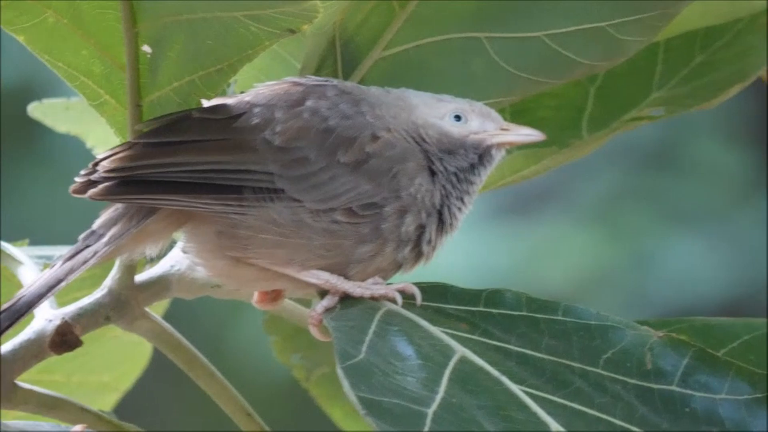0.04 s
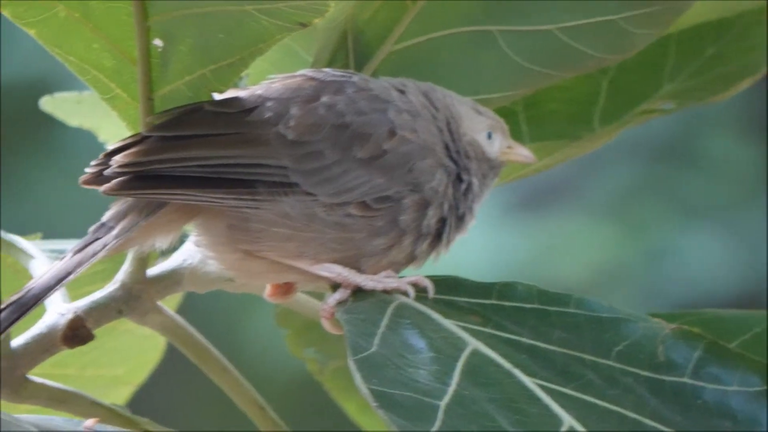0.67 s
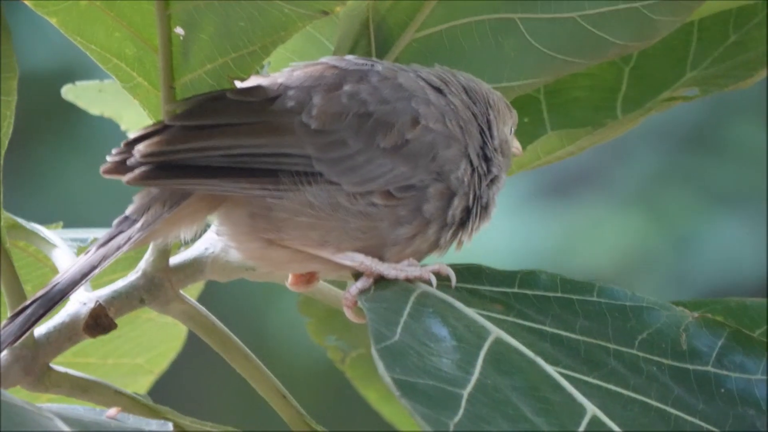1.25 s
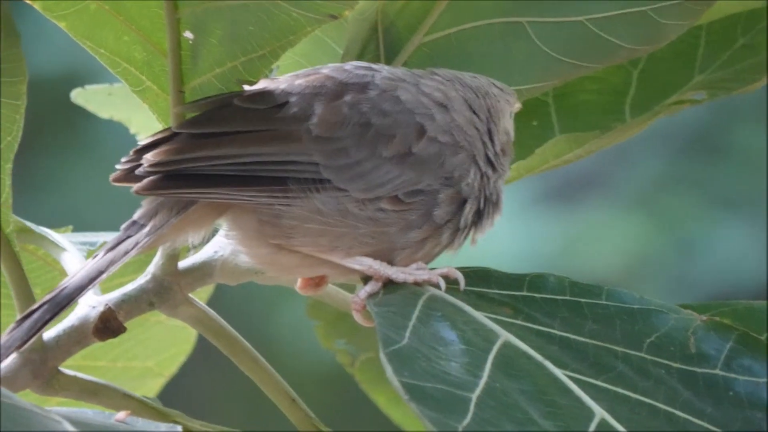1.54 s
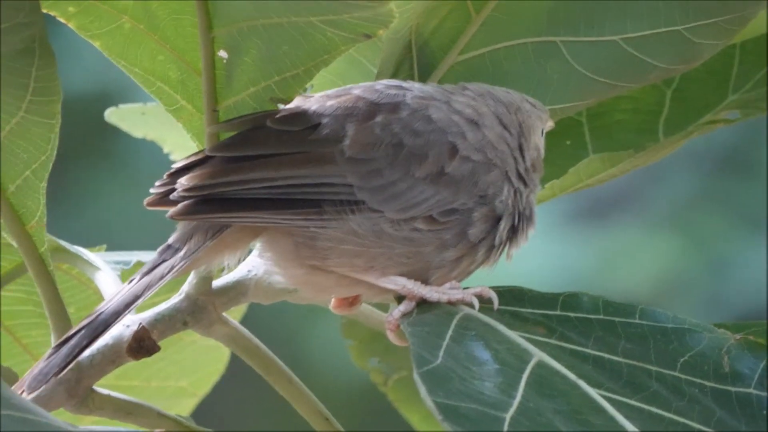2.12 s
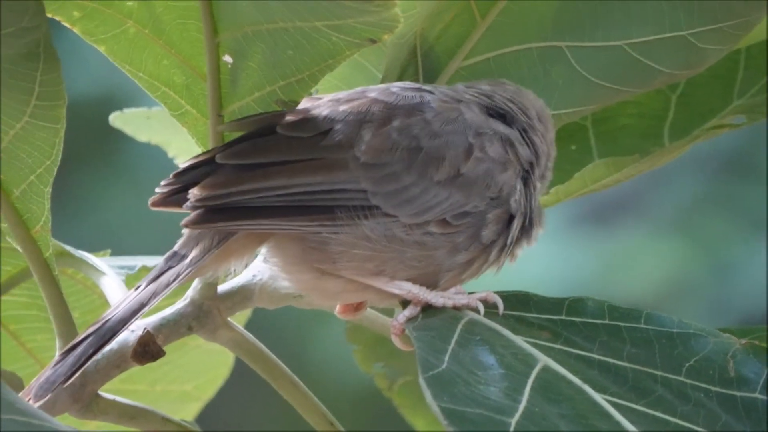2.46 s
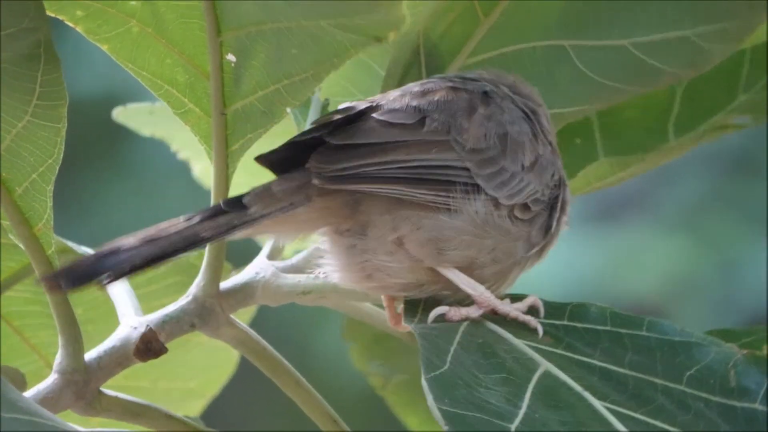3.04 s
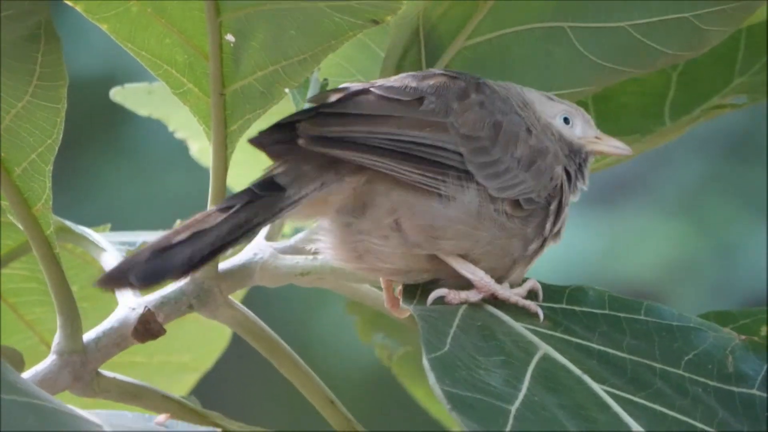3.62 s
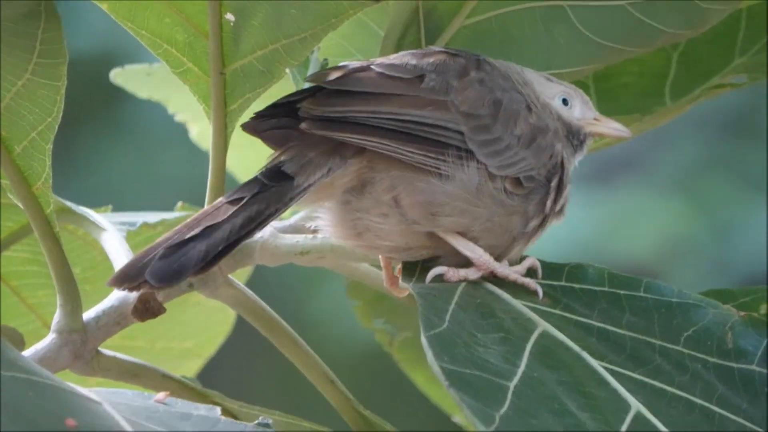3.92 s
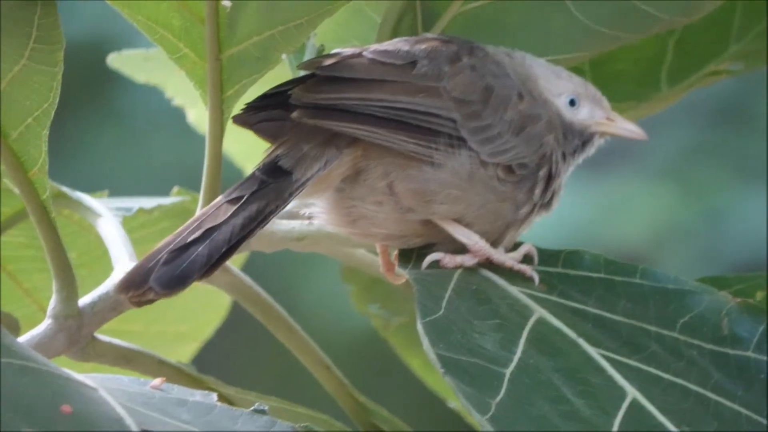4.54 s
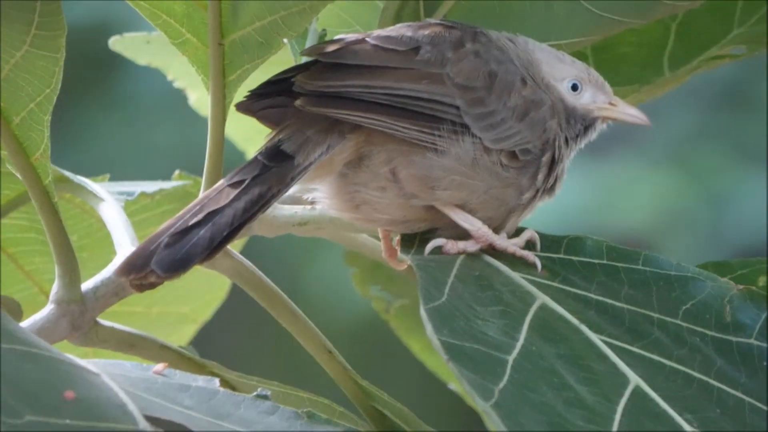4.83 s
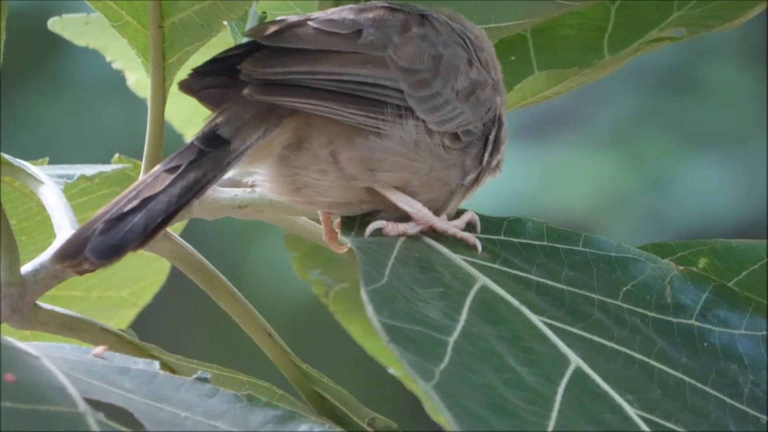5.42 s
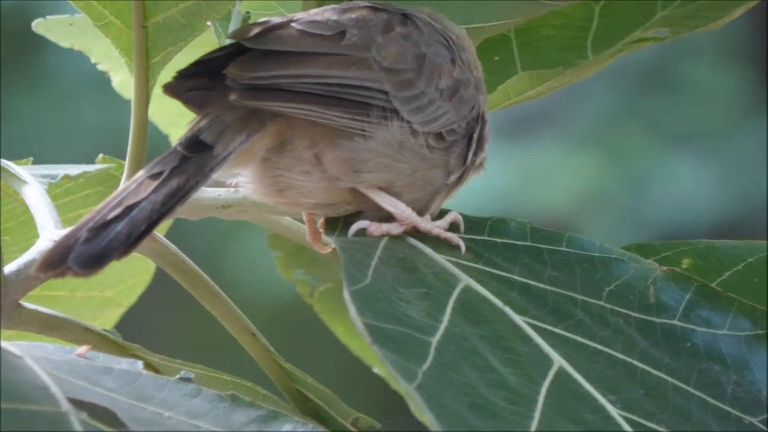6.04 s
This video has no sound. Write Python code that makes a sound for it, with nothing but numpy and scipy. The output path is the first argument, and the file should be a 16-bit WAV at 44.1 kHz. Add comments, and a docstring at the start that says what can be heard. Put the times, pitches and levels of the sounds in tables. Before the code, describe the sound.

Outdoors among trees, a bird on the left gives a loud, echoing two-note whistle four times. A second bird pipes quick, lower notes through the first two thirds, while a distant engine thuds and gradually fades. Faint insects buzz in phrases and small birds chirp over soft air. Midway, feathers ruffle softly close to the microphone, then a crow caws several times.

```python
"""Koel among trees

A koel repeats its loud two-note whistle; trunks and foliage throw it back with a long tail.
Insects stridulate in phrases over a wash of air, a second bird pipes low notes, small birds chirp.
A one-cylinder engine thuds in the distance and fades. Later a babbler ruffles its feathers
close by, a crow caws and a faint drone rises."""
import sys
import numpy as np
from scipy import signal
from scipy.fft import rfft, irfft
from scipy.io import wavfile
from scipy.ndimage import uniform_filter1d

SR = 44100
rng = np.random.default_rng(int(sys.argv[2]) if len(sys.argv) > 2 else 0)


def wrap_up_sound(samples):
    """Save the sound to the file named by the first command line argument, as 16-bit audio."""
    columns = np.atleast_2d(samples).T
    # keep every value between -1 and 1, then stretch to whole-number steps
    tamed = np.clip(columns, -1, 1)
    steps = np.round(tamed * 32767).astype(np.int16)
    wavfile.write(sys.argv[1], SR, steps)


N = 276507
TIME = np.arange(N) / SR

# left-right likeness of noise (frequency [Hz], correlation [0-1])
COHERENCE = [(30, .5), (70, 1), (290, 0.96), (640, 0.81), (1400, 0.6), (7000, 0.67), (15000, 0.38)]
# foliage decay (frequency [Hz], T60 [s])
FOLIAGE_T60 = [(150, 0.15), (900, 0.98), (1300, .8), (2000, 0.9), (4000, 1.0), (7000, 0.8)]
# trunk and wall reflections (delay [s], gain [dB])
ECHOES = [(.009, -6), (.019, -6), (.026, -12.5), (.033, -6.5), (.043, -15.5), (.052, -17), (.066, -22),
          (.078, -7), (.095, -18), (.112, -18.5), (.17, -18), (.25, -21)]

# koel, first notes (time [s], top pitch [Hz], level [dB])
OPENING_NOTES = [(-.155, 2064, -32.5), (1.508, 2102, -32.5), (3.216, 2164, -32), (4.843, 2289, -29.5)]
# koel, second notes (time [s], top pitch [Hz], level [dB], dive depth [ratio])
CLOSING_NOTES = [(.214, 2265, -33, 1.0), (1.864, 2300, -33, 1.0), (3.579, 2391, -30.5, .98),
                 (5.212, 2459, -29.5, 0.87)]
# leap, sag, hold, fall (time in note [s], pitch / top [ratio], gain [dB])
OPENING_CONTOUR = [(0, .7, -16), (.018, .9, -11), (.035, .98, -6.5), (.053, .998, -4), (.085, .96, -3),
                   (.13, .98, -4), (.168, .965, -1), (.207, .89, -4), (.25, .77, -11)]
# arch, dive, flick, sink (time in note [s], pitch / top at full depth [ratio], gain [dB])
CLOSING_CONTOUR = [(0, .73, -14), (.02, .88, -7.5), (.04, .955, -5), (.068, 1, -2.8), (.12, .988, -1.3),
                   (.15, .95, -2), (.178, .8, -6), (.2, .69, -5), (.214, .71, -6.5), (.229, .885, -5.5),
                   (.255, .838, -3.5), (.29, .79, -6), (.32, .72, -14)]
# koel harmonics 2, 3, 4 at FULL_EFFORT_DB and CREST_HZ (gain [dB])
OVERTONES_DB = [-48, -13, -62]
FULL_EFFORT_DB, CREST_HZ = -13.5, 2270

# insect bands (frequency [Hz], relative density [dB])
UPPER_INSECT_SPECTRUM = [(4300, -44), (4700, -8.5), (4950, -1.5), (5150, 1), (5400, -10), (5900, -41)]
LOWER_INSECT_SPECTRUM = [(3600, -44), (4200, -15), (4500, -0.5), (4720, 1), (4950, -3), (5400, -40)]
# insect phrases (time [s], length [s], level [dB])
UPPER_PHRASES = [(-.37, 0.48, -49.5), (.655, 0.4, -50.5), (1.475, 0.6, -51.5), (2.485, 0.52, -50),
                 (3.445, 0.56, -50), (4.42, 0.34, -49), (5.44, 0.48, -50), (6.2, .45, -56)]
LOWER_PHRASES = [(-.4, 0.43, -46), (.26, 0.52, -47), (.94, 0.27, -52), (1.69, 0.72, -51.5),
                 (2.28, 0.51, -47), (2.88, 1.0, -50.5), (4.18, 0.786, -49.5), (5.5, 0.82, -52.5)]

# open air and broad hiss (frequency [Hz], relative density [dB])
AIR_SPECTRUM = [(20, -25), (50, -19), (90, 1.5), (140, 8.5), (250, 1), (480, -6), (850, -5.5), (1500, -4),
                (2600, -6.5), (4000, -5.5), (6000, -11), (7500, -20), (9300, -17.5), (15000, -34)]
HISS_SPECTRUM = [(50, -23), (200, 21.5), (450, 3), (1000, 4.5), (2500, -6.5), (5000, -5), (7500, -7.5),
                 (9300, -5), (12000, -15.5), (15000, -21)]
# hiss fade (time [s], level [dB])
HISS_LEVEL = [(0, -44), (.5, -48), (1.5, -50.5), (2.7, -53), (4, -57.5), (6.27, -77)]

# piping notes, about four a second (time [s], level [dB])
PIPING_NOTES = [(0.012, -36.5), (0.268, -35.5), (0.513, -36.5), (0.754, -35.5), (1.017, -35), (1.257, -35),
                (1.513, -35), (1.767, -37), (2.049, -36.5), (2.393, -36), (2.717, -36), (3.013, -37.5),
                (3.281, -39.5), (3.548, -37.5), (3.787, -36)]
# firm pip, softer arch (time in note [s], pitch [Hz], gain [dB])
PIPING_CONTOUR = [(0, 1250, -6), (.016, 1305, 4), (.028, 1370, -1), (.04, 1480, -6), (.062, 1680, -8),
                  (.09, 1470, -6), (.112, 1140, -8), (0.126, 1020, -13)]
# rms pitch roughness (pip [ratio], arch [ratio])
PIPING_JITTER = (.08, .17)

# engine speed (time [s], firing rate [Hz])
FIRING_RATE = [(0, 14.684), (.5, 14.836), (1.2, 15.133), (1.7, 15.53), (2.5, 15.696), (4.2, 15.865),
               (5.2, 15.518), (5.7, 15.077), (6.27, 14.482)]
# exhaust thud (frequency [Hz], relative density [dB])
EXHAUST_SPECTRUM = [(20, -58), (50, -26.5), (68, -39), (95, -9.5), (120, -4), (142, 4.5), (165, 1),
                    (190, -11), (220, -4.5), (300, -11), (365, -12.5), (420, -29), (700, -54),
                    (2000, -58.5)]
# engine loudness (time [s], level [dB])
ENGINE_LEVEL = [(0, -39.3), (.55, -41.5), (1, -38.6), (1.65, -37.5), (2, -41.2), (2.8, -41.5), (3.7, -43.7),
                (4.2, -48), (4.55, -48), (4.72, -45.3), (5.25, -45.8), (5.5, -50), (5.65, -47.5),
                (5.85, -48.5), (6.27, -48.5)]
# knock on either side of the exhaust pipe's hum (time [s], gain [dB])
KNOCK_GAIN = [(0, .7), (1.6, .3), (2, -1), (3.7, -2.5), (4.3, -2), (5.2, -4.5), (5.8, -7), (6.27, -3)]

# small birds' slurs (time [s], length [s], start pitch [Hz], fall [ratio], level [dB])
SLURS = [(0.216, 0.0476, 3570, 0.074, -46.5), (0.313, 0.042, 4400, 0.22, -45.5),
         (0.924, .04, 3480, 0.074, -49.5), (1.014, 0.028, 4200, 0.25, -52), (1.705, 0.046, 4400, 0.14, -49),
         (2.26, 0.09, 10200, .03, -64), (2.33, 0.1, 3520, 0.14, -51), (2.609, 0.053, 3350, .11, -50),
         (2.828, 0.077, 3670, 0.055, -55), (3.664, 0.14, 3900, 0.13, -48), (4.38, .09, 4150, .04, -54),
         (5.23, .14, 3450, .12, -57)]
# held whistles (time [s], length [s], pitch [Hz], level [dB])
WHISTLES = [(0.873, 0.2, 2985, -57), (1.2, .22, 2985, -59), (2.653, 0.07, 2975, -48.5),
            (4.944, 0.26, 2973, -56), (5.28, .3, 2960, -60), (5.786, 0.26, 1423, -56),
            (5.852, 0.18, 8600, -66), (5.91, 0.2, 2940, -53)]

# feather strokes (time [s], length [s], level [dB])
RUFFLES = [(2.859, 0.12, -55), (2.986, 0.089, -48.5), (3.04, 0.21, -56), (3.096, 0.027, -58),
           (3.196, 0.095, -57.5), (4.666, 0.037, -57), (5.42, 0.28, -57.5)]
# feather friction (frequency [Hz], relative density [dB])
FEATHER_SPECTRUM = [(1500, 4), (4000, 5.5), (7000, 5), (11000, 2), (15000, -2)]

# caws (time [s], length [s], nominal pitch [Hz], formant scale [ratio], roughness [0-1], level [dB])
CAWS = [(3.82, 0.12, 439, 1.084, 0.84, -39), (4.172, 0.12, 438.1, 1.037, 0.97, -38),
        (5.37, 0.065, 420, 1.06, 0.24, -55.5), (5.749, .06, 382.4, 1.03, 0.36, -47.5),
        (6.102, 0.092, 385, 1.004, 0.78, -43.5)]
# throat resonances (unscaled centre [Hz], width [Hz], gain [dB])
CROW_FORMANTS = [(837, 330, 2.5), (1644, 310, 2), (2680, 990, -4.5), (3250, 220, -9.5)]

# far drone (time [s], pitch [Hz], level [dB])
DRONE = [(4.3, 260, -90), (4.55, 268, -56), (4.9, 270, -59), (5.17, 275, -52), (5.4, 300, -61),
         (5.65, 300, -90)]


def amp(db):
    """Decibels to gain."""
    return 10 ** (np.asarray(db) / 20)


def unit(x):
    """Scale to rms 1."""
    return x / np.sqrt(np.mean(x ** 2) + 1e-20)


def curve(rows):
    """Rows (time, value), interpolated per sample."""
    return np.interp(TIME, *np.transpose(rows))


def spectrum(rows, hz):
    """Rows (frequency, value), interpolated on a log axis."""
    row_hz, value = np.transpose(rows)
    return np.interp(np.log(hz + 1), np.log(row_hz + 1), value)


def add(mix, start_s, sound):
    """Mix a sound in, cropped to fit."""
    start = round(start_s * SR)
    sound = sound[max(-start, 0):]
    part = mix[max(start, 0):][:len(sound)]
    part += sound[:len(part)]


def pan(left_db):
    """Channel gains for a left-minus-right level."""
    return amp([[left_db / 2], [-left_db / 2]])


def pair(a, b, coherence):
    """Correlated stereo from two independent signals."""
    coherence = np.clip(coherence, 0, 1)
    return np.array([a, coherence * a + np.sqrt(1 - coherence ** 2) * b])


def noise(colour):
    """Diffuse coloured stereo noise, rms 1."""
    hz = np.fft.rfftfreq(N, 1 / SR)
    a, b = rfft(rng.standard_normal((2, N)))
    return unit(irfft(pair(a, b, spectrum(COHERENCE, hz)) * amp(spectrum(colour, hz)), N))


def wander(size, rate_hz):
    """Smooth random drift, rms about 1."""
    hz = np.fft.rfftfreq(size + SR, 1 / SR)
    return unit(irfft(rfft(rng.standard_normal(size + SR)) * np.exp(-(hz / rate_hz) ** 2)))[:size]


def echoes(x):
    """Single reflections, slightly offset between channels."""
    out = np.zeros((2, N))
    for delay_s, db in ECHOES:
        for channel in out:
            add(channel, delay_s + rng.uniform(0, 93e-6), amp(db) * x)
    return out


def foliage(x, build_s, coherence):
    """Leaf scatter: a dense tail that builds, then decays by band."""
    size = 2 * SR
    taps = rng.standard_normal((2, size)) * (rng.random((2, size)) < .1)
    hz, t, bands = signal.stft(pair(*taps, coherence), SR, nperseg=256)
    bands = bands * amp(-60 * t / spectrum(FOLIAGE_T60, hz)[:, None]) * (1 - np.exp(-t / build_s))
    tail = signal.istft(bands, SR, nperseg=256)[1]
    midband = abs(np.fft.rfftfreq(tail.shape[1], 1 / SR) - 2000) < 500
    tail /= np.sqrt(np.mean(abs(rfft(tail)[:, midband]) ** 2))
    return signal.fftconvolve(x[None], tail, axes=1)[:, :N]


def koel_note(contour, top_hz, depth, db):
    """Gliding near-sine; unsteady overtones emerge when loud and high."""
    knots_s, ratio, shape_db = np.transpose(contour)
    t = np.arange(0, knots_s[-1], 1 / SR)
    dip = uniform_filter1d(1 - np.interp(t, knots_s, ratio), size=450)  # the voice rounds each turn
    hz = top_hz * (1 - depth * dip)
    phase = 2 * np.pi * np.cumsum(hz * (1 + .006 * wander(len(t), 72))) / SR
    level = amp(db + np.interp(t, knots_s, shape_db) + 2.4 * wander(len(t), 57))
    effort = level / amp(FULL_EFFORT_DB) * (hz / CREST_HZ) ** 4
    rough_phase = phase + .22 * wander(len(t), 400)
    overtones = sum(amp(gain_db) * np.sin(k * rough_phase) for k, gain_db in enumerate(OVERTONES_DB, 2))
    return level * unit(np.sin(phase) + effort * overtones) * signal.windows.tukey(len(t), .08)


def koel():
    """Two-note calls from the left, thrown back by trunks and foliage."""
    dry = np.zeros(N)
    for start_s, top_hz, db in OPENING_NOTES:
        add(dry, start_s, koel_note(OPENING_CONTOUR, top_hz, 1, db))
    for start_s, top_hz, db, depth in CLOSING_NOTES:
        add(dry, start_s, koel_note(CLOSING_CONTOUR, top_hz, depth, db))
    early = dry * pan(left_db=14) + amp(3) * echoes(dry) * pan(left_db=6)
    return early + amp(.7) * foliage(dry, build_s=.062, coherence=.65)


def phrase_gain(rows, rest_db, throb_db=0):
    """Insect phrases swell, hold or throb, and fade over the rest of the swarm."""
    swell_s, fade_s = .11, .15
    throb_hz, first_throb_s = 9.75, .0088
    level = np.zeros(N)
    for start_s, length_s, db in rows:
        t = TIME - start_s
        swell = np.clip(.5 + t / swell_s, 0, 1)
        fade = np.clip(.5 + (length_s - t) / fade_s, 0, 1)
        throb = np.cos(2 * np.pi * throb_hz * (t - first_throb_s))
        level = np.maximum(level, amp(db + throb_db * throb) * swell * fade)
    return np.hypot(level, amp(rest_db))


def insects():
    """Stridulation in two narrow bands, slightly right; the upper one throbs."""
    upper_gain = phrase_gain(UPPER_PHRASES, rest_db=-60, throb_db=2.5) * amp(wander(N, 60))
    upper = upper_gain * noise(UPPER_INSECT_SPECTRUM)
    lower_gain = phrase_gain(LOWER_PHRASES, rest_db=-58) * amp(1.7 * wander(N, 27))
    lower = lower_gain * noise(LOWER_INSECT_SPECTRUM)
    return upper * pan(left_db=-5) + lower * pan(left_db=-3)


def air():
    """Soft wash of open air plus a slowly fading hiss."""
    wash = amp(-49 + 1.13 * wander(N, 14)) * noise(AIR_SPECTRUM)
    return wash + amp(curve(HISS_LEVEL)) * noise(HISS_SPECTRUM)


def piping_bird():
    """Clear pips from the left, each fraying into a soft, rough arch."""
    dry = np.zeros(N)
    knots_s, shape_hz, shape_db = np.transpose(PIPING_CONTOUR)
    for start_s, db in PIPING_NOTES:
        pace, tuning = 1 + rng.standard_normal(2) * [.1, .02]
        t = np.arange(0, knots_s[-1], pace / SR)
        jitter = np.interp(t, knots_s[[1, 3]], PIPING_JITTER)
        hz = np.interp(t, knots_s, shape_hz) * tuning * (1 + jitter * wander(len(t), 350))
        level = amp(db + np.interp(t, knots_s, shape_db) + 2 * wander(len(t), 90))
        tone = np.sin(2 * np.pi * np.cumsum(hz) / SR)
        add(dry, start_s, level * tone * signal.windows.tukey(len(t), .06))
    early = amp(-9) * (dry + amp(-4) * echoes(dry)) * pan(left_db=13)
    return early + amp(-6.5) * foliage(dry, build_s=.005, coherence=.8) * pan(left_db=7)


def exhaust_thud(size=8192):
    """One firing as a minimum-phase pulse: sharp front, ringing tail."""
    hz = abs(np.fft.fftfreq(size, 1 / SR))
    log_gain = np.log(amp(spectrum(EXHAUST_SPECTRUM, hz)))
    return -np.fft.ifft(np.exp(signal.hilbert(log_gain).conj())).real[:size // 2]


def engine():
    """A thud per firing and its slap off a wall; drawing away leaves mainly the pipe's hum."""
    first_firing_s, hum_band_hz = .0405, (140, 147)
    slap_s, slap_db = .033, -12.5
    cycles = np.cumsum(curve(FIRING_RATE)) / SR
    count = np.floor(cycles - np.interp(first_firing_s, TIME, cycles))
    firings = np.diff(count, prepend=count[0]) * amp(.5 * rng.standard_normal(N))
    direct = unit(signal.fftconvolve(firings, exhaust_thud())[:N])
    scatter = unit(foliage(direct, build_s=.083, coherence=.96))
    slap = np.zeros(N)
    add(slap, slap_s, amp(slap_db) * direct)
    level = amp(curve(ENGINE_LEVEL))
    distance_ratio = level.max() / level
    scatter *= amp(-13.5) * distance_ratio ** .2
    sound = level * (direct + slap + scatter + amp(-18) * noise(EXHAUST_SPECTRUM))
    hum = signal.sosfiltfilt(signal.butter(1, hum_band_hz, "bandpass", fs=SR, output="sos"), sound)
    return hum + (sound - hum) * amp(curve(KNOCK_GAIN))


def chirp(length_s, start_hz, fall, quaver_hz):
    """Thin, quavering tone that drops by a fraction of its pitch."""
    size = int(length_s * SR)
    hz = start_hz * (1 - np.linspace(0, fall, size)) + quaver_hz * wander(size, 206)
    return unit(np.sin(2 * np.pi * np.cumsum(hz) / SR) * signal.windows.tukey(size, .5))


def small_birds():
    """Buzzy slurs and faint held whistles, scattered by deep foliage."""
    dry = np.zeros(N)
    for start_s, length_s, hz, fall, db in SLURS:
        add(dry, start_s, amp(db) * chirp(length_s, hz, fall, quaver_hz=40 + 4000 * fall ** 2))
    for start_s, length_s, hz, db in WHISTLES:
        add(dry, start_s, amp(db) * chirp(length_s, hz, fall=0, quaver_hz=30))
    return amp(-5.5) * dry + amp(-4.5) * foliage(dry, build_s=.004, coherence=.7)


def feathers():
    """Barbs slide over each other in short, grainy strokes."""
    strokes = np.zeros(N)
    for start_s, length_s, db in RUFFLES:
        progress = np.linspace(0, 1, int(length_s * SR))
        add(strokes, start_s, amp(db) * unit(progress * (1 - progress) ** 2))
    return strokes * unit(noise(FEATHER_SPECTRUM) * amp(1.6 * wander(N, 400)))


def crow():
    """Voiced pulses, rasping mid-caw, through a throat that brightens as the bill opens."""
    dry = np.zeros(N)
    for start_s, length_s, pitch_hz, scale, rough, db in CAWS:
        size = int(length_s * SR)
        opening = np.sin(np.pi * np.linspace(0, 1, size) ** 1.6).clip(0)
        cycles = np.cumsum(pitch_hz * (.94 + .1 * opening + .06 * rough * wander(size, 200))) / SR
        pulses = unit(sum(np.cos(2 * np.pi * k * cycles) for k in range(1, 11)))
        rasp = .85 * wander(size, 280) * pulses + 2.6 * rng.standard_normal(size)
        hz = np.fft.rfftfreq(size, 1 / SR)
        drive = rfft(pulses + rough * opening * rasp)
        drive *= 1 - 1 / (1 + (hz / 600) ** 6)  # the bill radiates little bass
        caw = np.zeros(size)
        for k, (centre_hz, width_hz, gain_db) in enumerate(CROW_FORMANTS):
            formant = amp(gain_db) / (1 + ((hz - centre_hz * scale) / (width_hz / 2)) ** 2)
            caw += irfft(drive * formant, size) * opening ** (.062 + .22 * k)
        add(dry, start_s, amp(db) * unit(caw))
    early = amp(.5) * (dry + amp(-.5) * echoes(dry)) * pan(left_db=8)
    return early + amp(-1.5) * foliage(dry, build_s=.047, coherence=.72) * pan(left_db=.5)


def drone():
    """Faint, blurred, slightly rising tone, perhaps far traffic."""
    knots_s, shape_hz, shape_db = np.transpose(DRONE)
    hz = np.interp(TIME, knots_s, shape_hz) * (1 + .09 * wander(N, 70))
    tone = np.sin(2 * np.pi * np.cumsum(hz) / SR) * amp(3.2 * wander(N, 50))
    return amp(np.interp(TIME, knots_s, shape_db)) * unit(tone)


def scene():
    """All sources over open air, in stereo."""
    return (air() + koel() + piping_bird() + small_birds() + crow()
            + engine() + drone() + insects() + feathers())


def record(dry):
    """Steep low-pass."""
    cutoff_hz = 15200
    lowpass = signal.firwin(511, cutoff_hz, window=("kaiser", 9), fs=SR)
    return signal.oaconvolve(dry, lowpass[None], "same")


dry = scene()
out = record(dry)
wrap_up_sound(out)
```